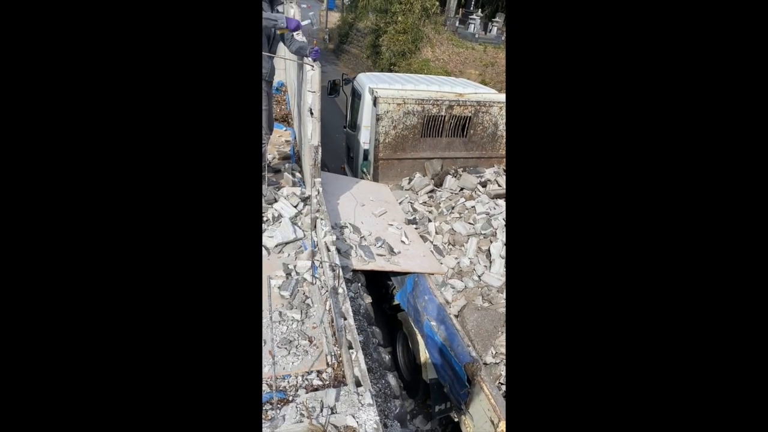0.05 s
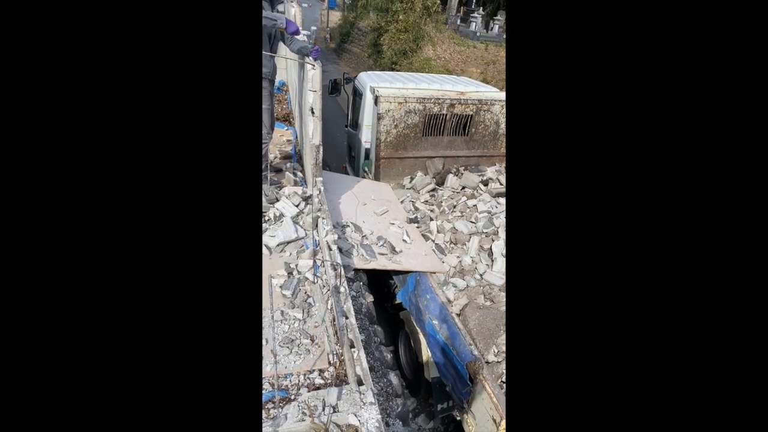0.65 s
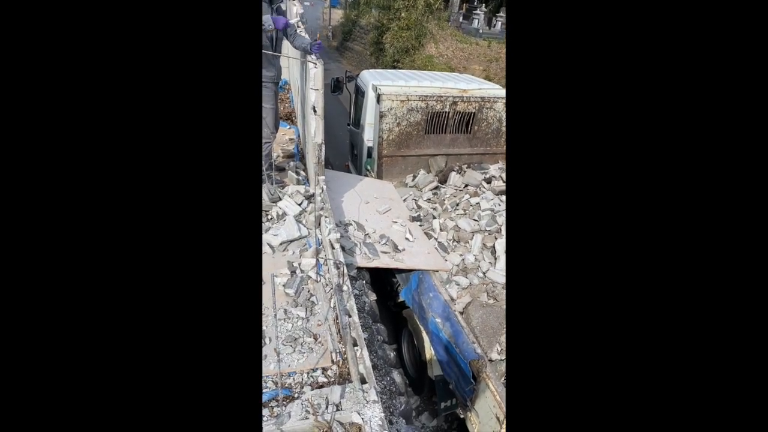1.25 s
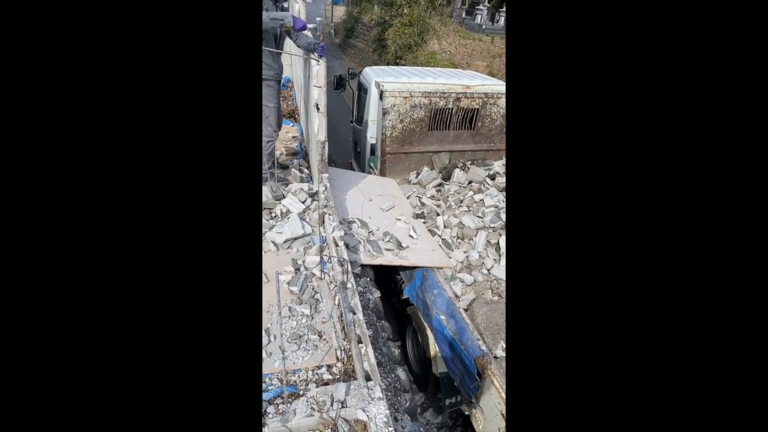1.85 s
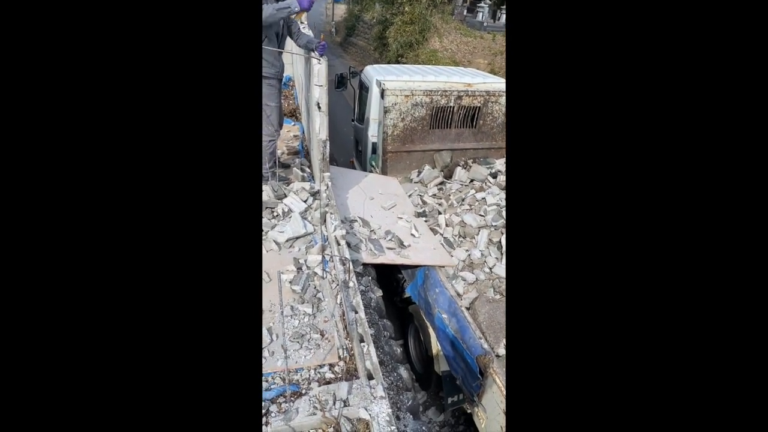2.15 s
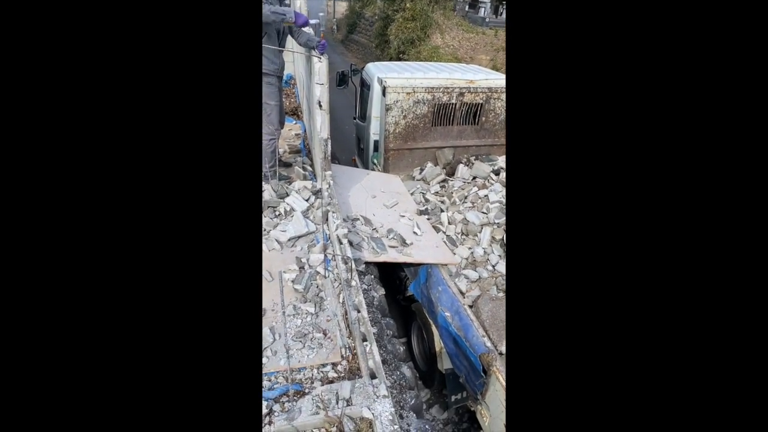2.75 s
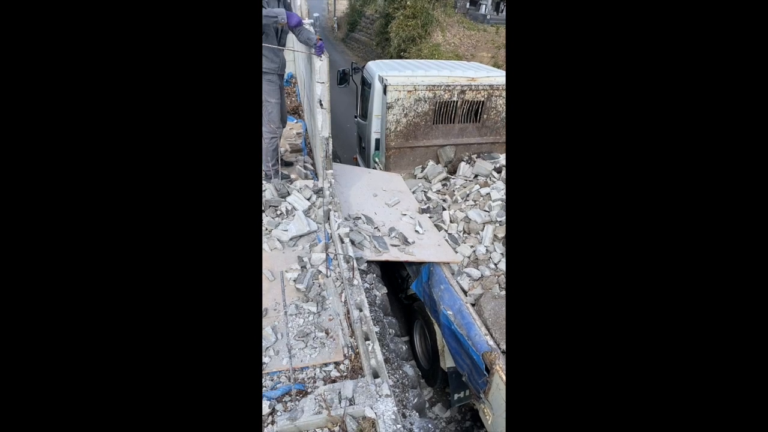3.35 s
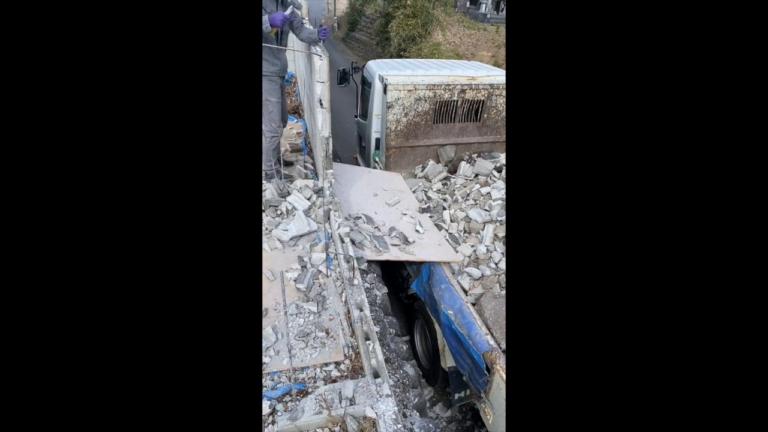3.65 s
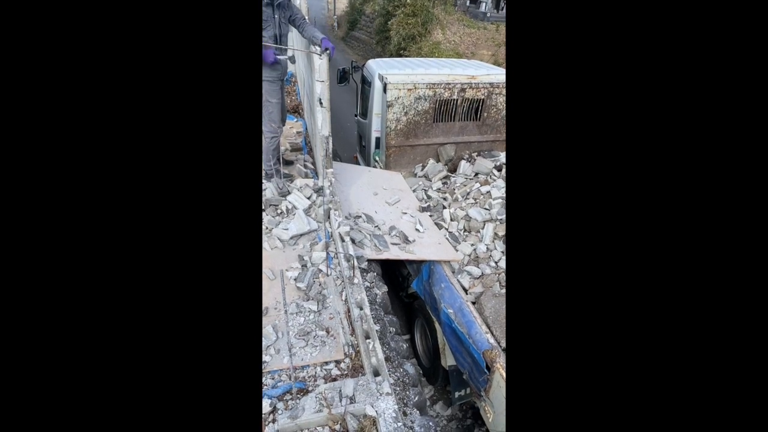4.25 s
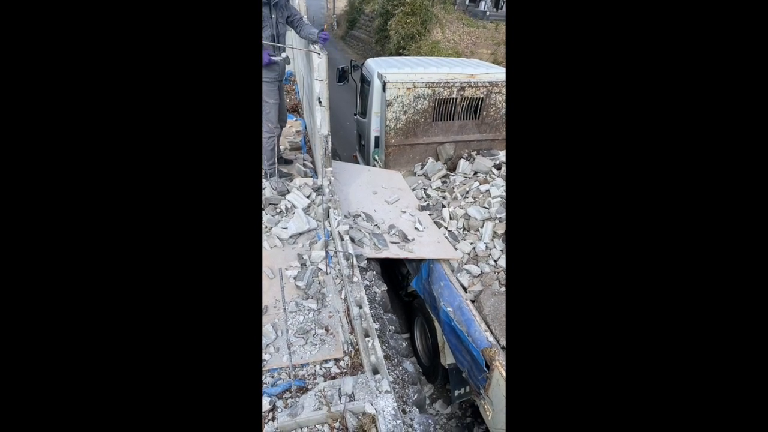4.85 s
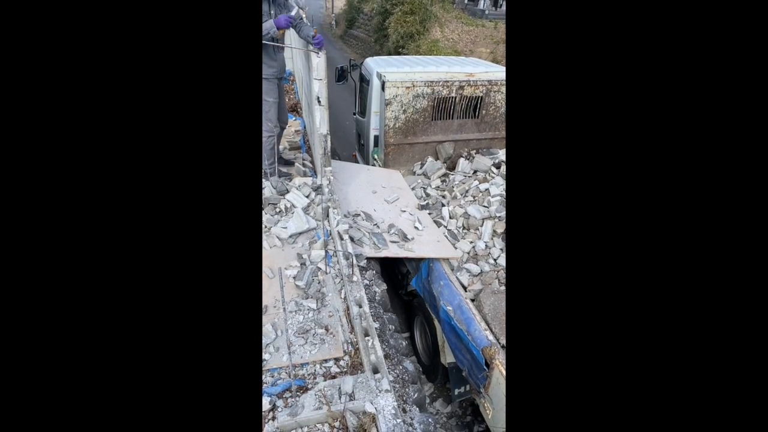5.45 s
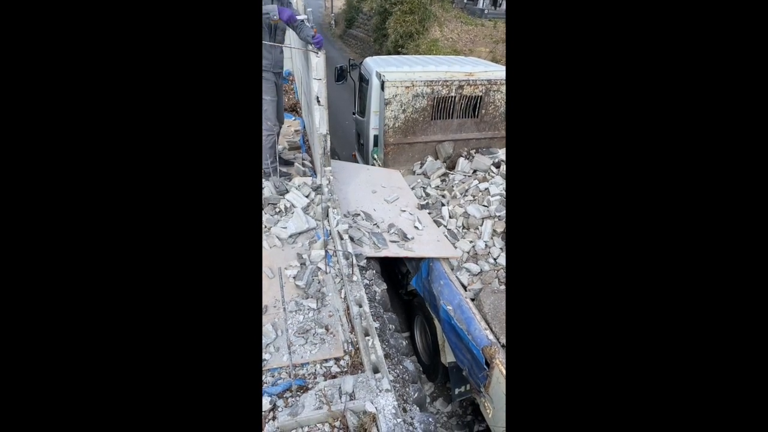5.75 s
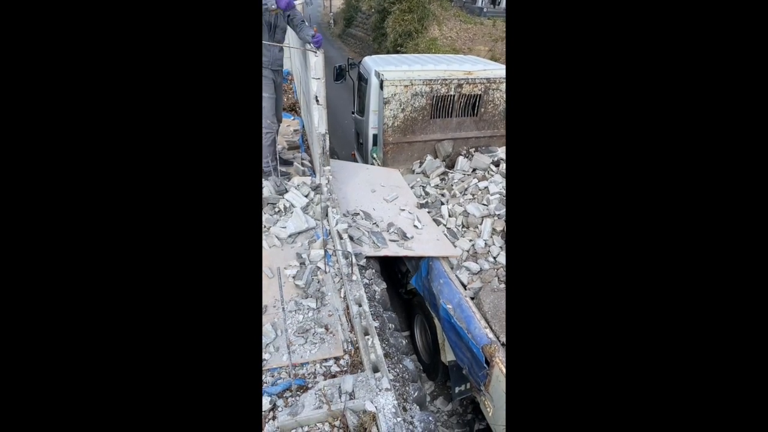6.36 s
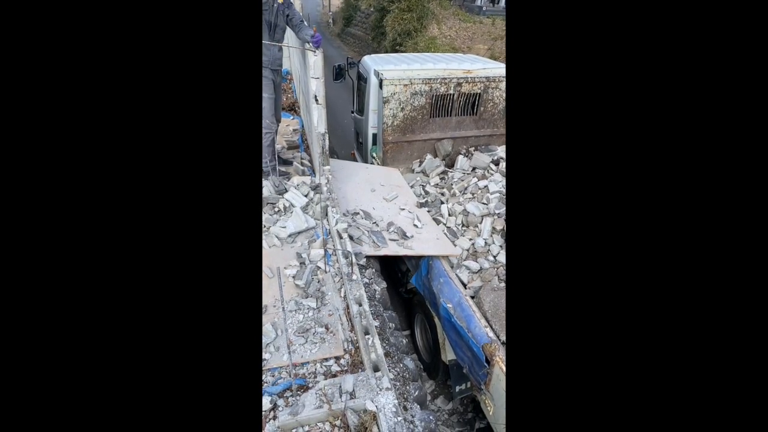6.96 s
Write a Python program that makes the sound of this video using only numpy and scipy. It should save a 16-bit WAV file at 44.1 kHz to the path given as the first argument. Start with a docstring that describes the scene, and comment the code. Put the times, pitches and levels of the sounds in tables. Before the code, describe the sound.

A hammer crunches into concrete blocks outdoors as rubble clatters; an idling truck engine shudders to a stop, then the hammering resumes.

```python
"""An open yard, where a hand hammer breaks up a concrete block wall beside a tipper truck full of rubble.
Each blow is a dense crunch with a short ring of masonry and steel, and the yard answers it. Loose pieces
knock, clink and boom on the truck bed, and grit runs down the wall. The engine's firings hum and clatter
at idle; then the fuel is cut, it shudders to rest, and the hammering starts again over faint traffic."""
import sys
import numpy as np
from scipy import signal
from scipy.fft import rfft, irfft, next_fast_len
from scipy.io import wavfile
from scipy.ndimage import map_coordinates

SR = 44100
rng = np.random.default_rng(int(sys.argv[2]) if len(sys.argv) > 2 else 0)


def file_out(sig):
    """Save sig as 16-bit WAV at sys.argv[1]."""
    # one column per channel
    cols = np.atleast_2d(sig).T
    # limit, then scale
    lim = np.clip(cols, -1, 1)
    pcm = np.round(lim * 32767).astype(np.int16)
    wavfile.write(sys.argv[1], SR, pcm)


N = 317079


def amp(db):
    """Decibels to gain."""
    return 10 ** (np.asarray(db) / 20)


def unit(x):
    """Scale to rms 1."""
    return x / np.sqrt(np.mean(x ** 2) + 1e-20)


def attack(t, rise_s):
    """A fade-in that eases up to 1."""
    return 1 - np.exp(-t / rise_s)


def along(points, hz):
    """Read (Hz, value) points on a log frequency axis."""
    freqs, values = np.transpose(points)
    return np.interp(np.log(hz + 1), np.log(freqs + 1), values)


def automation(points):
    """Join (seconds, value) points into one value per sample."""
    return np.interp(np.arange(N) / SR, *np.transpose(points))


def wobble(rate, size=N):
    """A smooth random curve, rate knots a second."""
    knots = rng.standard_normal(int(size * rate / SR) + 4)
    return map_coordinates(knots, [np.arange(size) * rate / SR])


def filtered(x, response):
    """Equalise x with a gain given as a function of Hz."""
    n = x.shape[-1]
    padded = next_fast_len(n + 8192)
    return irfft(rfft(x, padded) * response(np.fft.rfftfreq(padded, 1 / SR)), padded)[..., :n]


# Stereo image of direct and of diffuse sound. Each row: frequency in Hz, left-right correlation.
DIRECT = [(100, .9), (1000, .87), (3000, .8), (6000, .85), (8000, .99), (11500, .99), (13500, .93)]
DIFFUSE = [(50, .92), (130, .45), (290, -.1), (1400, .25), (3100, 0), (6900, -.4), (8000, -.999),
           (11800, -.999), (13000, -.3)]
def noise(spectrum, image, size=N):
    """Stereo noise of rms 1 with a given colour and stereo image."""
    def mid_side_gains(hz):
        angle = np.arccos(np.clip(along(image, hz), -1, 1)) / 2
        return amp(along(spectrum, hz)) * [np.cos(angle), np.sin(angle)]
    mid, side = filtered(rng.standard_normal((2, size)), mid_side_gains)
    return unit(np.array([mid + side, mid - side]))


def add(track, s, sound):
    """Mix a sound into the track at s seconds."""
    part = track[:, max(round(s * SR), 0):][:, :sound.shape[-1]]
    part += sound[..., :part.shape[1]]


def ringing(modes, t, detune=0., rough=0.):
    """Damped modes, new at each strike; rough (turns per root second) blurs their pitch."""
    out = np.zeros((2, len(t)))
    for hz, db, t60 in modes:
        steps = np.repeat(rng.normal(size=len(t) // 64 + 1), 64)
        drift = rough * np.cumsum(steps)[:len(t)] / np.sqrt(64 * SR)
        pitch = hz * (1 + detune * rng.normal())
        phase = pitch * t + drift + rng.random() + .08 * rng.normal(size=(2, 1))
        out += amp(db + 2 * rng.normal() - 60 * t / t60) * np.sin(2 * np.pi * phase)
    return out


# The hammer hits. Each row: start in seconds, level in dB, thud, knock, crack and spray in dB, crush
# length and block t60 in seconds, clank pitch in Hz and level in dB, bars in dB, nearest bar's pitch in
# Hz and level in dB, head level in dB and t60 in seconds, yard send in dB.
BLOWS = [(0.0729, -17, -4.5, -13, 0.5, 3.5, 0.008, 0.1, 2514, -4, -41, 3970, -24.5, -24, .3, -32),
         (0.5905, -16.5, -8, -13, -1, 2.5, 0.0058, 0.18, 1308, 1.5, -27.5, 2458, -31, -24, 0.36, -31.5),
         (1.865, -21.5, -9, -3.5, 1.5, 7, 0.0052, 0.31, 2295, 6, -31.5, 4310, -21.5, -24, 0.24, -20),
         (2.2964, -17, -6, -3, 0.5, 7, 0.0053, 0.15, 2440, -3, -26, 3040, -18, -27, .24, -23),
         (2.7696, -16, -10.5, -7.5, -4, 7, 0.0028, 0.19, 3730, -5, -38, 3857, -26, -18, 0.35, -22.5),
         (3.2395, -24.5, -3, -0.5, 4.5, 3, 0.0061, 0.19, 2694, 8, -36, 2930, -13.5, -19, 0.28, -15),
         (5.7076, -22.5, -5.5, -6.5, 2, -4, 0.0088, 0.25, 2033, -1.5, -30, 5670, -14.5, -30, .24, -16),
         (6.1585, -19, -5.5, -2.5, 4.5, 3, 0.0092, .14, 4240, 8, -17.5, 2520, -13, -29, 0.25, -18),
         (6.659, -21.5, -4.5, 9.5, 2.5, 4, 0.0098, 0.17, 4230, 9, -13.5, 2977, -18, -18, 0.27, -12),
         (7.151, -19.5, -0.5, 5, 6.5, 2, 0.0034, 0.09, 5370, 9.5, -9, 5220, -7, -24, .24, -8.5)]
# Colours of crushed concrete and of flying grit. Each row: frequency in Hz, level in dB.
CRUNCH_EQ = [(40, -34), (90, -11.5), (150, 0), (210, -2.5), (300, -10), (430, -6.5), (580, -4.5), (800, -4),
             (1200, -2), (2600, -2.5), (3500, -5.5), (4300, -5), (6000, -9), (7500, -7), (9200, -10.5),
             (11300, -16), (12800, -16), (15300, -19), (16500, -46.5)]
SPRAY_EQ = [(500, -27), (5000, -11), (7200, -3), (8600, 3), (10500, 0), (13000, 0), (15500, -4),
            (16500, -24)]
# The ring of a block, its cavity and the rebar. Each row: pitch in Hz, level in dB, t60 in seconds.
BLOCK_MODES = [(1330, 1, .17), (2035, -1, .13), (2455, 2, .11), (2660, -2, .11), (3075, 0, .11),
               (3720, -4, .11), (3970, -3, .1), (4255, 0, .09), (5230, -1, .08), (5480, -4, .08),
               (6600, -7, .07)]
CAVITY_MODES = [(474, 1.5, .06), (565, -2, 0.046), (676, -1, 0.049)]
REBAR_MODES = [(1141, -5, .8), (1292, 0, .42), (1545, -9, .6), (1631, -11, .6), (1986, -9, .4),
               (2620, -2, .6), (3120, -5, .62), (4080, -7, .52), (4245, -7, .45), (4425, -2, .55),
               (5235, -7, .35), (5770, -9, .33)]
# The steel head's ping. Each row: pitch in Hz, level in dB, share of the head's t60.
HEAD_MODES = [(7370, 11, .15), (8560, 14, .2), (13400, -9, .45), (14100, -8, .55), (15287, 3, .95)]
def hammer():
    """The head crushes concrete for a few milliseconds, the crack runs on, block and steel ring out."""
    out, t = np.zeros((2, N)), np.arange(int(.9 * SR)) / SR
    for (s, db, thud_db, knock_db, crack_db, spray_db, crush_s, t60, clank_hz, clank_db,
         bars_db, bar_hz, bar_db, head_db, head_t60, yard_db) in BLOWS:
        thud, body, crack = masonry(CRUNCH_EQ, len(t))
        # the crush is a chain of tiny fractures; the face keeps spalling for a moment, more quietly
        fractures = unit(amp(3 * np.clip(wobble(900, len(t)), -2, 1.5)))
        crush = amp(-60 * np.maximum(t - crush_s, 0) / .028)
        spall = amp(-9 - 60 * np.maximum(t - .021, 0) / .04)
        blow = body * (np.maximum(crush, spall) + amp(-9.5 - 60 * t / t60))
        blow += amp(-12.5) * ringing(BLOCK_MODES, t, detune=.004, rough=1.5)
        blow *= attack(t, .0012)
        # each spot of the wall has one stony mode that stands out
        clank = attack(t, .0018) * ringing([(clank_hz, clank_db, .09)], t, rough=5)
        # the treble snaps and is soon gone; the heavy wall swings longer
        snap = (crush + amp(-4.5 - 60 * t / (.5 * t60))) * attack(t, .0005)
        blow += amp(crack_db) * crack * fractures * snap
        blow += amp(thud_db - 60 * t / (1.21 * t60)) * attack(t, .00059) * thud
        cavity_onset = attack(np.maximum(t - .002, 0), .0008)  # the cavity answers 2 ms late
        blow += amp(knock_db) * cavity_onset * ringing(CAVITY_MODES, t, rough=4.5)
        bars = amp(bars_db) * ringing(REBAR_MODES, t, detune=.003, rough=3.1)
        bars += ringing([(bar_hz, bar_db, .36)], t, rough=3.4)
        head_modes = [(hz, level, share * head_t60) for hz, level, share in HEAD_MODES]
        head = amp(head_db) * ringing(head_modes, t, rough=2.8)
        # grit bursts from under the head in a short bright spray
        burst = amp(spray_db - 60 * t / .036) * attack(t, .00029)
        spray = burst * fractures * noise(SPRAY_EQ, DIRECT, len(t))
        direct = from_wall(spray + blow + clank + bars + head)
        add(out, s, amp(db) * (direct + amp(yard_db) * yard(blow)))
    return out


def masonry(spectrum, size):
    """A hollow block's crowded modes, uneven from spot to spot, as thud, body and crack of rms 1."""
    modes = noise(spectrum, DIRECT, size)
    knots_hz = np.arange(200, 17000, 190)
    resonance_db = 3.5 * np.clip(rng.normal(size=len(knots_hz)), -2, 1.3)
    hollow = filtered(modes, lambda hz: amp(np.interp(hz, knots_hz, resonance_db)))
    lows = filtered(hollow, lambda hz: 1 / (1 + (hz / 700) ** 8))
    lows_and_mids = filtered(hollow, lambda hz: 1 / (1 + (hz / 4000) ** 8))
    return unit(lows), unit(lows_and_mids - lows), unit(hollow - lows_and_mids)


# The wall's place in the image. Each row: frequency in Hz, phase lead of the left side in radians.
LEFT_LEAD = [(100, 0), (1000, 0), (1700, -.3), (2500, .7), (3500, 1.1), (4800, 2.1), (6000, 1.9),
             (8000, 2.9), (10500, 3.2), (12500, 3.8), (14000, 4.6), (16000, 5.2)]
def from_wall(x):
    """Sound from the wall reaches left and right out of step."""
    return filtered(x, lambda hz: np.exp(.5j * along(LEFT_LEAD, hz) * np.array([[1], [-1]])))


# The yard's reverb. Each row: frequency in Hz, t60 in seconds.
YARD_DECAY = [(100, 1), (500, 0.84), (1500, 0.76), (4500, 0.33), (7300, 0.3), (9500, 0.26), (11800, .17),
              (13500, 0.13)]
def yard(x):
    """Scattered echoes from truck and houses, each frequency dying at its own speed."""
    hz, t, bands = signal.stft(noise([(1000, 0)], DIFFUSE, x.shape[1]), SR, nperseg=256)
    tail = signal.istft(bands * amp(-60 * t / along(YARD_DECAY, hz)[:, None]), SR, nperseg=256)[1]
    return signal.fftconvolve(x, tail / np.linalg.norm(tail[0]), axes=1)[:, :x.shape[1]]


# Loose chunks knocking. Each row: start in seconds, level, thud and crack in dB, t60 in seconds.
PIECES = [(0.2895, -30.5, -23, -4, 0.11), (0.314, -26, -10, -2, 0.036), (0.321, -28.5, -8, -14, 0.18),
          (0.327, -32, -8, 1, 0.05), (0.354, -32.5, -10, -11, 0.14), (0.36, -34.5, -6, 2, 0.052),
          (0.366, -40, 0.5, -16, 0.46), (1.33, -29.5, -8, -4, 0.045), (1.335, -27.5, -12, -5, 0.038),
          (1.34, -33, -13, -2, 0.054), (1.354, -28.5, -5, -22, 0.12), (1.359, -41, 8, -19.5, 0.09),
          (1.378, -37.5, -7, -18, 0.52), (1.42, -34.5, -12.5, -9, 0.19), (1.429, -34, -7, -7.5, 0.07),
          (3.272, -26.5, 5.5, -11, 0.091), (3.284, -36, 9, -15, 0.082), (3.502, -42.5, 19.5, -7, 0.03),
          (3.565, -30, 17.5, -10, 0.024), (3.782, -20.5, -2, 7.5, 0.022), (3.786, -23, 5.5, -13, 0.023),
          (3.805, -36.5, -8, 0, 0.031), (4.021, -46.5, -8.5, 4, 0.028), (4.038, -56, -7.5, 7, 0.029),
          (4.061, -59, -10, -4, 0.029), (4.121, -56, -6.5, -10, .04), (4.142, -51, -20.5, 0, 0.041),
          (4.318, -53, -13, 1, 0.031), (4.401, -55.5, -9.5, -6, 0.05), (4.661, -58, -9, -3.5, 0.11),
          (4.962, -52, -14.5, -2, 0.13), (5.025, -44.5, -12, -28, 0.14), (5.258, -57, -7, -5, 0.045),
          (5.311, -54.5, 5.5, -20, 0.05), (5.351, -55.5, 0, -6.5, 0.062), (5.366, -48.5, 7, -8.5, 0.058),
          (5.497, -56.5, -13, -7, 0.041), (6.012, -49, 6.5, -1.5, 0.083), (6.03, -62, 14, -30, 0.58)]
# Their dull, stony colour. Each row: frequency in Hz, level in dB.
STONE_EQ = [(40, -23.5), (150, 2.5), (280, 11), (420, 13.5), (620, 14), (1000, 10.5), (2800, 2.5),
            (6000, -8.5), (8000, -9.5), (10000, -25.5), (14000, -30), (16500, -43)]
# Hard shards clinking. Each row: start in seconds, level in dB, pitch in Hz, t60 in seconds.
CLINKS = [(0.29, -36, 2650, 0.16), (.3165, -21, 2900, 0.02), (.321, -27.5, 3180, 0.055),
          (1.335, -30, 1834, 0.094), (1.354, -30, 2520, 0.045), (3.782, -15.5, 2580, 0.025),
          (3.781, -24, 3310, 0.045), (4.96, -47.5, 1997, 0.28), (4.961, -52.5, 3360, 0.11),
          (4.964, -53.5, 1480, 0.39), (5.024, -56, 1920, 0.1), (5.405, -65, 2380, 0.23),
          (6.008, -50, 2710, 0.086), (6.009, -48.5, 1770, 0.13), (6.018, -47.5, 845, 0.26),
          (6.067, -56, 2630, 0.071)]
# A shard's partials. Each row: multiple of the pitch, level in dB.
SHARD_PARTIALS = [(0.7, -5), (0.993, 3.5), (1.403, -6), (1.69, -14.5)]
# Rubble landing on the steel truck bed. Each row: start in seconds, level in dB.
BED_HITS = [(0.331, -28.5), (1.357, -22.5), (6.666, -31)]
# The bed's boom. Each row: pitch in Hz, level in dB, t60 in seconds.
BED_MODES = [(395, -9, 0.45), (455, 3, 0.17), (441, -8.5, .85), (515, -15, .6), (616, -16.5, 0.24),
             (695, -6, 0.2), (978, -7, .17)]
def rubble():
    """Loose pieces knock dully or clink; some set the truck bed booming."""
    out, t = np.zeros((2, N)), np.arange(int(.7 * SR)) / SR
    for s, db, thud_db, crack_db, t60 in PIECES:
        thud, body, crack = masonry(STONE_EQ, len(t))
        knock = amp(thud_db) * thud + body + amp(crack_db) * crack
        knock *= amp(-60 * t / t60) * attack(t, .00067)
        knock *= amp(2.8 * np.clip(wobble(350, len(t)), -2, 1.5) * (t > .003))  # edges chip
        add(out, s, amp(db) * (from_wall(knock) + amp(-25) * yard(knock)))
    for s, db, hz, t60 in CLINKS:
        modes = [(k * hz, level, t60) for k, level in SHARD_PARTIALS]
        add(out, s, amp(db) * ringing(modes, t, rough=3) * attack(t, .0007))
    for s, db in BED_HITS:
        add(out, s, amp(db) * ringing(BED_MODES, t, rough=1) * attack(t, .0031))
    return out


# The wandering idle. Each row: time in seconds, firing rate in Hz.
IDLE_RATE = [(0.0, 49.1), (0.08, 51.64), (0.28, 51.63), (0.39, 50.72), (1.5, 51.33), (1.8, 53),
             (2.08, 53.04), (3.25, 52.89)]
# The hum's overtones. Each row: multiple of the firing rate, level in dB against the second order.
OVERTONES = [(3, -15.5), (4, -19.5), (5, -19.5), (8, -18.5)]
# Brief dips of the hum, and short low bumps that swell through it. Each row: centre in seconds, change in dB,
# half width in seconds.
WAVERS = [(.13, -7.5, 0.13), (.69, -5.5, 0.091), (2.02, 3.5, 0.029), (2.18, 10.5, 0.011)]
# Colours of rumble, clatter and hiss (also for dust and air). Each row: frequency in Hz, level in dB.
RUMBLE_EQ = [(20, -18.5), (45, 1.5), (75, 2), (130, 1.5), (200, -1.5), (300, -24), (500, -17), (1500, -60)]
CLATTER_EQ = [(150, -19.5), (250, 0.5), (310, -8), (380, -5.5), (420, -2), (470, -5.5), (600, -5),
              (1000, -4.5), (1600, -13.5), (1900, -12), (2030, -9), (2170, -20), (2400, -18), (4900, -32.5),
              (7000, -30.5), (9000, -37), (11500, -39), (13200, -42.5), (15000, -42.5), (16400, -58)]
HISS_EQ = [(3000, -20), (6500, 0), (8500, -1), (11500, -2), (13300, 0), (15300, -3), (16200, -22)]
def engine(fuel_cut_s=3.34, friction_hz_per_s=39, burn_out_t60=.03):
    """Firings give a two-note hum and pulse the clatter; with the fuel cut, all sinks with the speed."""
    t = np.arange(N) / SR
    idle = automation(IDLE_RATE)
    coasting_s = np.maximum(t - fuel_cut_s, 0)
    rate = np.maximum(idle - friction_hz_per_s * coasting_s, 0)
    speed = rate / idle
    burning = amp(-60 * coasting_s / burn_out_t60)
    phase = 2 * np.pi * np.cumsum(rate) / SR + .073 * wobble(25)
    order = lambda k: np.sin(k * phase + 2 * np.pi * rng.random((2, 1)))
    # the second order is a little out of step between left and right
    upper = np.sin(2 * phase + .15 * np.array([[1], [-1]])) * amp(.82 * wobble(11))
    upper += sum(amp(db + .69 * wobble(5.8)) * order(k) for k, db in OVERTONES)
    waver_db = sum(db * np.exp(-((t - s) / width) ** 2) for s, db, width in WAVERS) + .5 * wobble(24)
    fundamental = amp(-26.5 + waver_db) * speed ** 4.7 * np.sin(phase)
    hum = fundamental + amp(-30 + .75 * waver_db) * burning * upper
    firing = amp(speed * (2 * np.cos(phase) + .45 * wobble(40)) + .78 * wobble(8.8))
    clatter = amp(-40.5) * speed ** 1.98 * firing * noise(CLATTER_EQ, DIFFUSE)
    rumble = amp(-37.5 + 2.6 * wobble(15)) * speed ** .99 * noise(RUMBLE_EQ, DIFFUSE)
    hiss = amp(-74) * speed ** .57 * noise(HISS_EQ, DIFFUSE)
    # without fuel the pistons only pump air, and the upper orders come forward
    pumping = unit(sum(amp(2 * wobble(12)) * order(k) for k in (2, 3, 3.5, 4, 5)))
    pumping *= amp(-33.5) * (1 - burning) * speed ** 1.5
    return np.sqrt(2) * hum + clatter + rumble + hiss + pumping


# The engine rocking on its mounts. Each row: start in seconds, level in dB.
SHUDDERS = [(3.724, -34), (3.903, -34), (4.049, -43), (4.261, -41.5), (4.39, -43), (4.589, -37),
            (4.648, -51.5), (4.948, -58)]
# Puffs of compressed air. Each row: start in seconds, level in dB, pitch in Hz.
PUFFS = [(3.872, -49, 1000), (4.003, -52.5, 900), (4.058, -50, 1130), (4.117, -50, 1150),
         (4.19, -54.5, 980), (4.322, -54, 950)]
# A jolted steel panel. One row: start in seconds, level in dB, pitch in Hz, t60 in seconds.
PANEL = (4.255, -57.5, 2950, .8)
def shudders():
    """The last compressions rock the dying engine: soft low thumps, puffs of air, a ringing panel."""
    out, t = np.zeros((2, N)), np.arange(SR // 2) / SR
    swell = lambda rise_s: t / rise_s * np.exp(1 - t / rise_s)
    thump_eq = [(25, -40), (55, 5.5), (75, 3), (115, -7.5), (200, -46), (600, -50)]
    for s, db in SHUDDERS:
        add(out, s, amp(db) * swell(.023) * noise(thump_eq, DIFFUSE, len(t)))
    for s, db, hz in PUFFS:
        puff_eq = [(400, -30), (.75 * hz, -4), (hz, 7), (1.25 * hz, -14), (2500, -20), (8000, -44)]
        add(out, s, amp(db) * swell(.0097) * noise(puff_eq, DIRECT, len(t)))
    s, db, hz, t60 = PANEL
    add(out, s, ringing([(hz, db, t60)], t, rough=3.6))
    return out


# Slides of grit and of fine dust. Each row: peak time in seconds, level in dB, rise and t60 in seconds.
GRIT_SLIDES = [(.34, -47.5, 0.11, 1.4), (.57, -38, 0.028, 0.38), (1.46, -48.5, 0.13, 1.5),
               (3.8, -53.5, .01, 2.4)]
DUST_SLIDES = [(.985, -49.5, 0.012, 0.16), (1.49, -50.5, 0.14, 1.2), (1.82, -58, 0.094, 0.76)]
def grit(trickle_db=-73.5):
    """Grit runs after every blow and slides down the wall over a steady trickle; fine dust hisses."""
    shed_by_blows = [(s, db - 15.5, .0098, .34) for s, db, *_ in BLOWS]
    flow = np.hypot(surges(list(GRIT_SLIDES) + shed_by_blows), amp(trickle_db))
    grains = unit(amp(2.4 * wobble(420) + 1.4 * wobble(45)))
    sand = noise([(800, -15.5), (2500, 9), (4000, 6.5), (6800, 2), (9000, -4), (11500, -11),
                  (13500, -15.5), (16000, -18)], DIFFUSE)
    dust = surges(DUST_SLIDES) * amp(1.4 * wobble(10)) * noise(HISS_EQ, DIFFUSE)
    return flow * grains * sand + dust


def surges(rows):
    """Joint envelope of flows that each build to a peak and then run out."""
    t = np.arange(N) / SR
    flows = [amp(db - 60 * np.maximum(t - s, 0) / t60) * np.exp(-(np.minimum(t - s, 0) / rise) ** 2)
             for s, db, rise, t60 in rows]
    return np.linalg.norm(flows, axis=0)


def crumbs(per_second=8, t60=.03):
    """Crumbs of mortar drop on the heap at random, each a faint tick with a pitch of its own."""
    out, t = np.zeros((2, N)), np.arange(SR // 20) / SR
    count = int(per_second * N / SR)
    for when, size, brightness in zip(rng.random(count), rng.normal(size=count), rng.random(count)):
        hz = 1800 * 2 ** (1.5 * brightness)
        tick = noise([(400, -14), (hz, 0), (2 * hz, -7), (16000, -22)], DIRECT, len(t))
        add(out, when * N / SR, amp(-65 + 2.5 * size - 60 * t / t60) * tick)
    return from_wall(out)


# The colour of the open air. Each row: frequency in Hz, level in dB.
AIR_EQ = [(20, -4.5), (60, 7), (120, -2.5), (250, -5), (500, -9), (1000, -16), (2000, -23.5), (4800, -29.5),
          (6800, -26.5), (9500, -34), (13500, -37.5), (16000, -43.5)]
# The fader ride on a low outdoor rumble. Each row: time in seconds, level in dB.
RUMBLE_SWELL = [(5.3, -75), (5.85, -49.5), (6.4, -53)]
def outdoors():
    """A faint, slowly moving rush of air and distant traffic, a low swell in it, and a thin hiss."""
    rush = amp(-52 + 2.2 * wobble(2.5) + .55 * wobble(6.7)) * noise(AIR_EQ, DIFFUSE)
    swell_eq = [(30, -17), (75, 7), (130, -8), (200, 0), (320, -13), (900, -50)]
    swell = amp(automation(RUMBLE_SWELL)) * noise(swell_eq, DIFFUSE)
    hiss = amp(-91.5 + 1.4 * wobble(20)) * noise(HISS_EQ, DIFFUSE)
    return rush + swell + hiss


def scene():
    """Hammer, rubble and truck in the open air."""
    return hammer() + rubble() + grit() + engine() + shudders() + outdoors() + crumbs()


# The stereo balance. Each row: frequency in Hz, left minus right in dB.
BALANCE = [(60, 0.5), (200, 2.5), (350, 3.5), (600, 10), (1100, 8), (1800, 2), (3000, -1), (8000, -0.5)]
def record(dry):
    """Lean the mids to the left, clip at full scale and cut the very top."""
    tilt = lambda hz: amp(along(BALANCE, hz) / 2 * np.array([[1], [-1]]))
    coloured = filtered(dry, lambda hz: tilt(hz) / tilt(hz).mean(axis=0))
    return filtered(np.clip(coloured, -1, 1), lambda hz: 1 / (1 + (hz / 16450) ** 120))


dry = scene()
out = record(dry)
file_out(out)
```